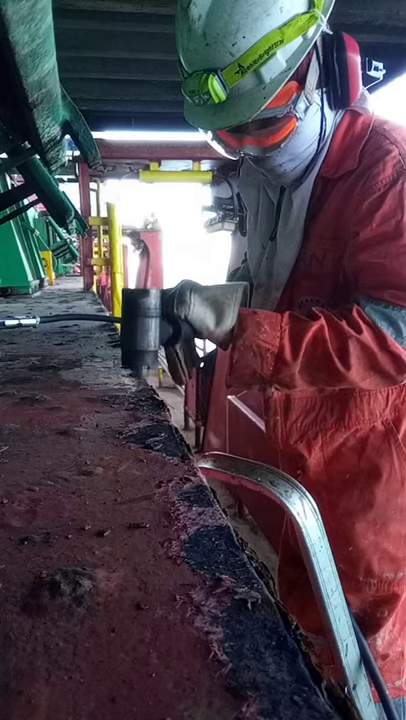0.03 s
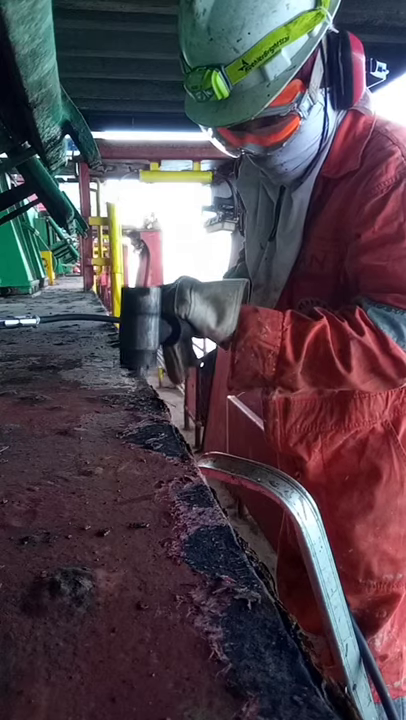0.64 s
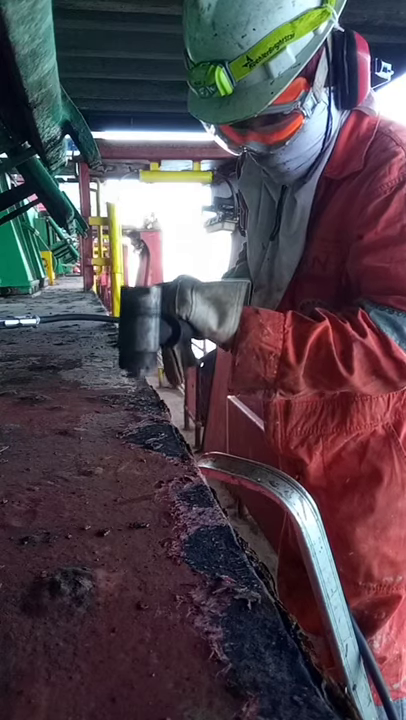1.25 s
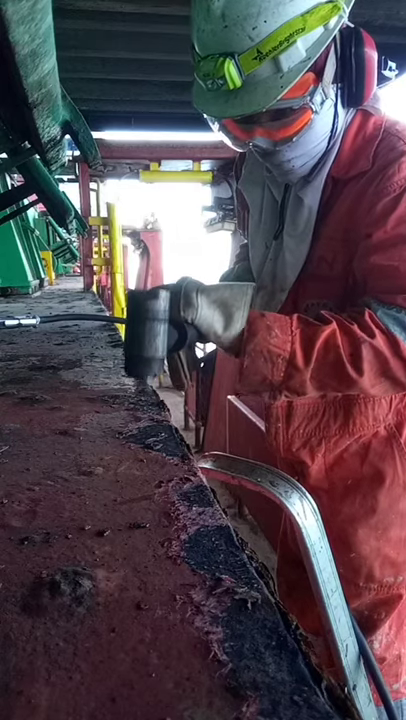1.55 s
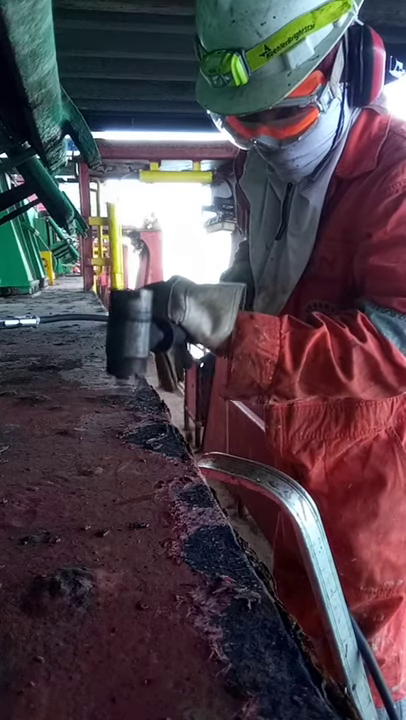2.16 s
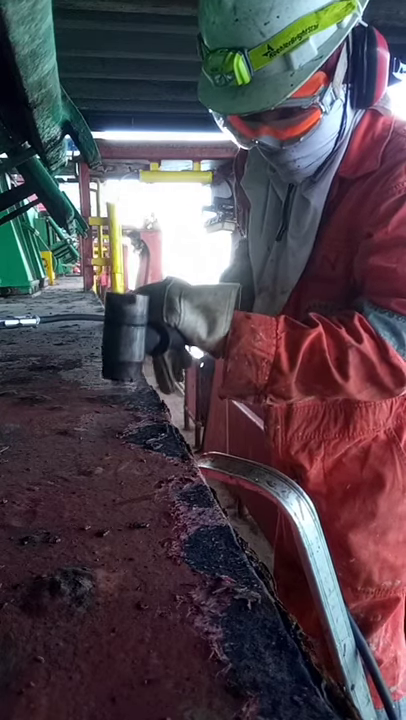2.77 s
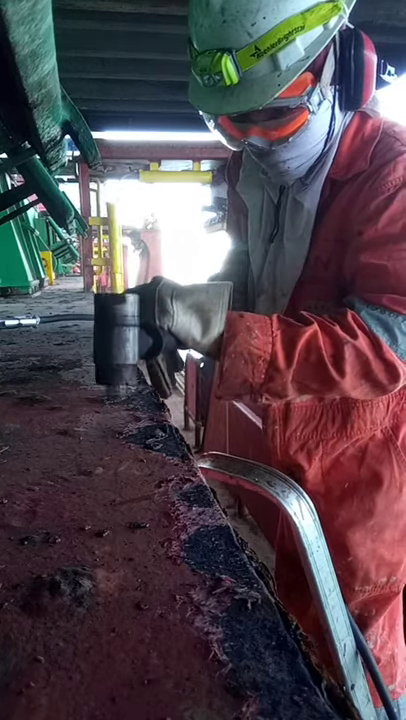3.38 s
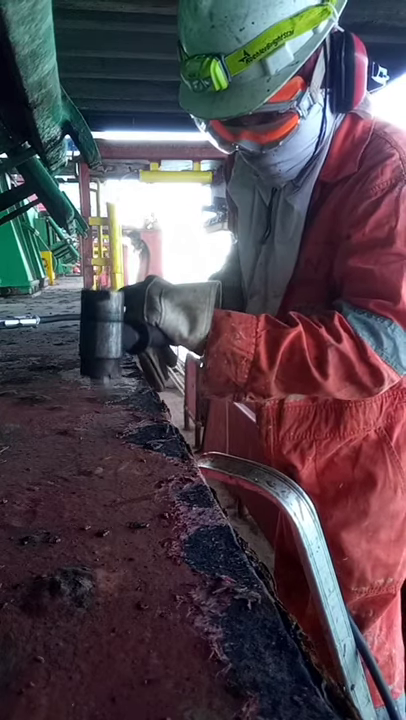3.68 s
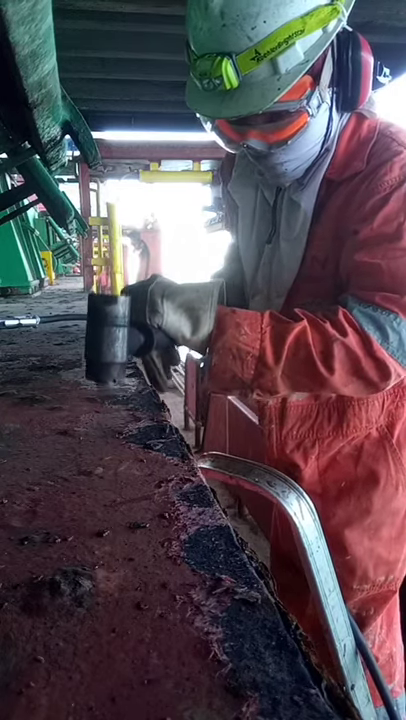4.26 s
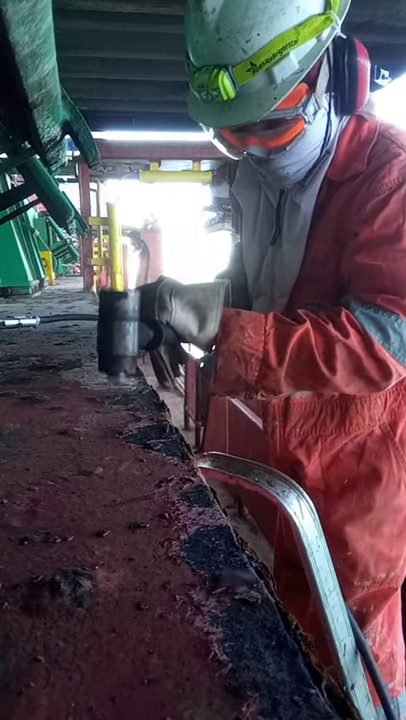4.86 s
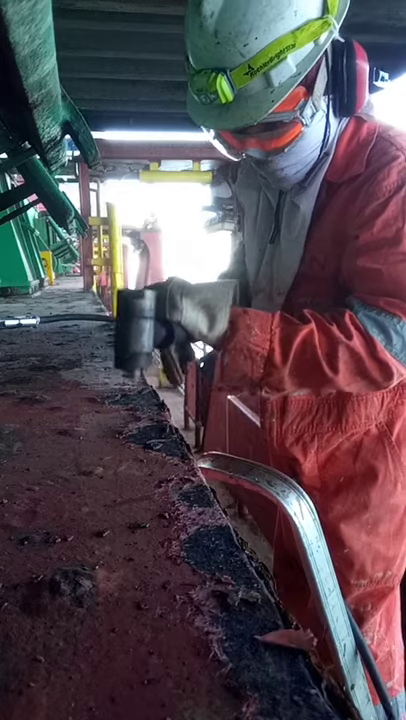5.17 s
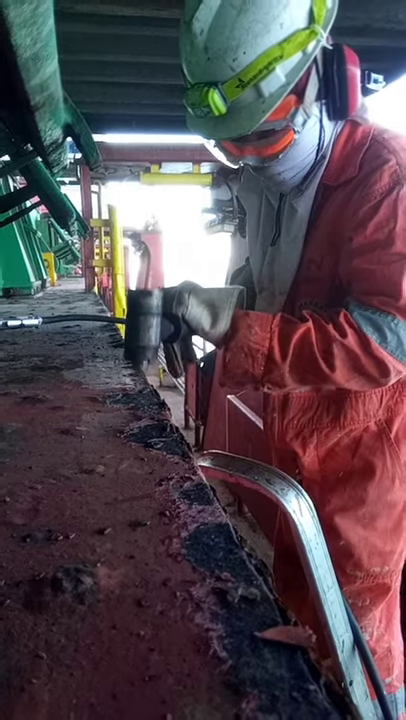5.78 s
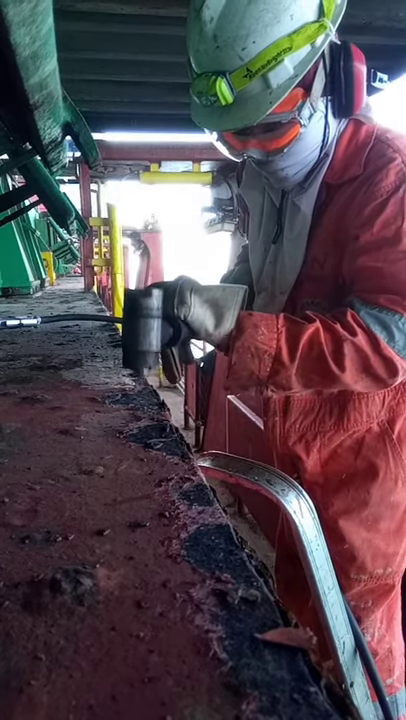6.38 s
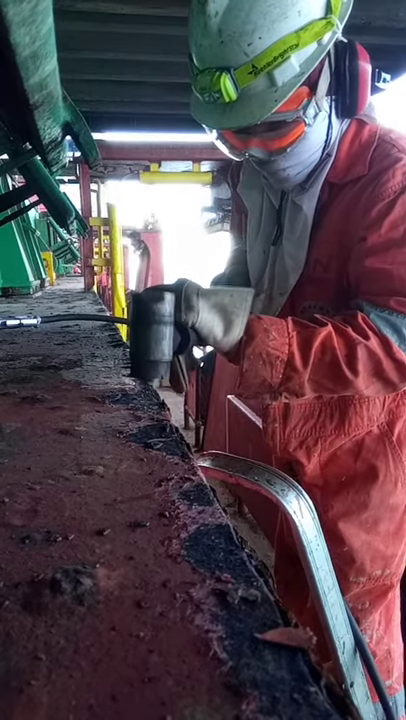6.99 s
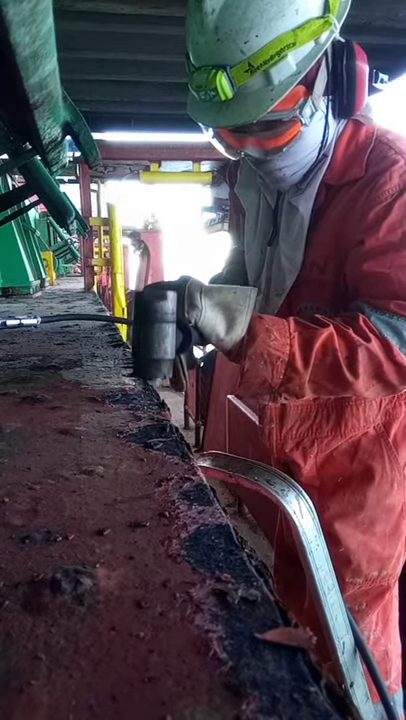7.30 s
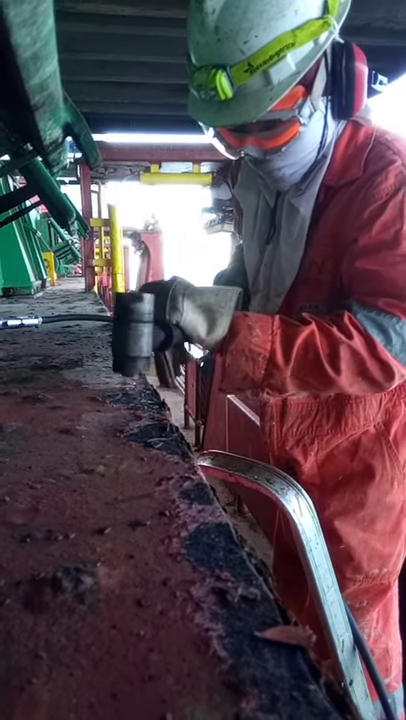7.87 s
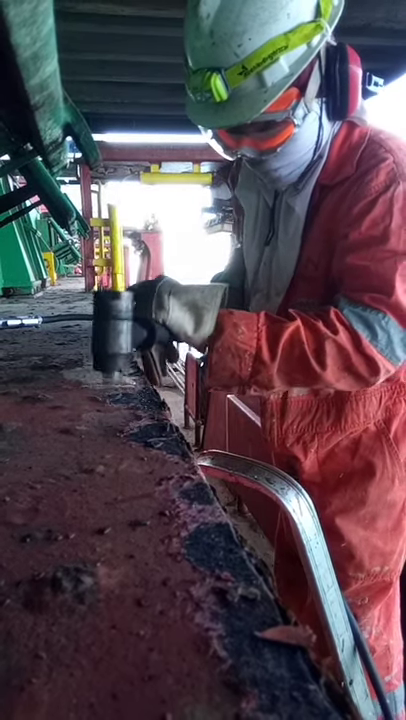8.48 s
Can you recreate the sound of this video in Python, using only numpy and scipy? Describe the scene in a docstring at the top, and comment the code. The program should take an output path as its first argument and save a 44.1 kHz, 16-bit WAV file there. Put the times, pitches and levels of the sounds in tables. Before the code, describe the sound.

Close by on a roofed steel deck, an air-powered hammer chips rust in a loud, continuous clatter. A pulsing low buzz and fluttering air hiss run beneath sharp metallic pings, with small gusts hitting the microphone. From about halfway the tool gives a few dull thuds, and its ring turns brighter on barer metal. Distant machinery hums faintly throughout.

```python
"""A steel deck under a roof, a phone microphone an arm's length from a pneumatic scaling hammer.
From the start three pistons beat against each other at about 61, 64 and 68 strokes a second: each stroke
puffs exhaust air through the housing, then strikes the plate, which rings and sheds rust. Air hisses and
gusts brush the microphone. From about 3 to 5 s the slow piston leads the throb; from 4.5 s come a few dull
knocks, and near 6 s barer steel rings brighter. Distant machinery drones to the end."""
import sys
import numpy as np
from scipy import signal
from scipy.fft import rfft, irfft
from scipy.io import wavfile
from scipy.ndimage import map_coordinates

SR = 44100
rng = np.random.default_rng(int(sys.argv[2]) if len(sys.argv) > 2 else 0)


def store_wav(level_fs):
    """Save 16-bit WAV to argv[1]."""
    pcm = np.round(np.clip(np.atleast_2d(level_fs), -1, 1) * 32767)
    wavfile.write(sys.argv[1], SR, pcm.T.astype(np.int16))


N = 385434
T = np.arange(N) / SR
SPOT_HZ = 14  # how often the struck spot changes
# spectrum of a bit cracking on the plate: (frequency [Hz], gain [dB])
CRACK_SPECTRUM = [(200, -41.5), (500, -10), (900, 3), (1200, -9), (1650, -1), (2300, -0.5), (3200, 0.5),
                  (4500, -1.5), (6400, 0), (8000, -18)]


def undb(db):
    """Decibels to gain."""
    return 10 ** (np.asarray(db) / 20)


def level(x, db):
    """Scale to an rms level."""
    return x * undb(db) / np.sqrt(np.mean(x ** 2))


def noise():
    """White noise."""
    return rng.standard_normal(N)


def walk(hz):
    """Random values, hz of them a second, joined smoothly; spread near 1."""
    knots = rng.standard_normal(4096)
    return map_coordinates(knots, [T * hz], order=2, mode="wrap")


def curves(rows):
    """One control for each column after the time, moving in straight lines between rows."""
    times, *columns = np.transpose(rows)
    return np.array([np.interp(T, times, column) for column in columns])


def swing(rows):
    """A level curve in dB above its own average."""
    db = curves(rows)[0]
    return db - np.mean(db)


def add(out, s, sound):
    """Mix a short sound in at a time."""
    start = int(s * SR)
    out[start:start + len(sound)] += sound[:N - start]


def colour(x, points):
    """Causal filter with a given (frequency [Hz], gain [dB]) spectrum, built from the cepstrum."""
    size = 4096
    hz, db = np.transpose(points)
    bins = np.maximum(np.fft.rfftfreq(size, 1 / SR), 1)
    gain = undb(np.interp(np.log(bins), np.log(hz), db))
    cepstrum = irfft(np.log(gain))
    cepstrum[1:size // 2] *= 2
    cepstrum[size // 2 + 1:] = 0
    response = irfft(np.exp(rfft(cepstrum)))
    return signal.fftconvolve(x, response)[:N]


def fade(x, seconds):
    """Give every impulse an exponential tail."""
    return signal.lfilter([1], [1, -np.exp(-1 / (seconds * SR))], x)


def resonate(x, hz, width):
    """One damped mode, gain 1 at its centre."""
    return signal.lfilter(*signal.iirpeak(hz, hz / width, fs=SR), x)


def gliding_mode(x, hz, width):
    """A damped mode whose pitch moves, gain 1 at its centre."""
    turn = np.exp(2j * np.pi * np.cumsum(hz) / SR)
    envelope = fade(x * np.conj(turn), 1 / (np.pi * width))
    return np.real(turn * envelope) * 2 * np.pi * width / SR


def tail(x, t60_s, spectrum):
    """A dense decaying response: countless plate modes, or reflections."""
    t = T[:SR // 2]
    response = rng.standard_normal(len(t)) * undb(-60 * t / t60_s) * (t > .002)
    response /= np.sqrt(np.sum(response ** 2))
    return colour(signal.fftconvolve(x, response)[:N], spectrum)


def impulses(times, scatter_db):
    """One impulse at each time; air pressure caps its strength, and a poor stroke falls short."""
    out = np.zeros(N)
    sizes = undb(-scatter_db * rng.rayleigh(size=4096)[:len(times)])
    inside = (times >= 0) & (times < T[-1])
    np.add.at(out, (times[inside] * SR).astype(int), sizes[inside])
    return out


def jitter(times, spread_s):
    """Make each moment slightly early or late."""
    return times + spread_s * rng.standard_normal(1024)[:len(times)]


def pistons(lean_db):
    """Stroke times of three free pistons: each rate wanders, and stumbles more under load."""
    # stroke rates: (time [s], main piston [Hz], slow piston [Hz], fast piston [Hz])
    rates = [(0.1, 64.8, 61.5, 68.3), (0.7, 64.6, 61, 68), (1.1, 65, 61, 67.5), (1.6, 64.7, 62.3, 67.3),
             (2.0, 64.4, 61.8, 67.5), (2.6, 63.8, 61.3, 66.8), (3.0, 64.8, 60.5, 68.3), (3.5, 64, 61.6, 68),
             (3.9, 65, 61.2, 67.5), (4.5, 64, 60.8, 68.5), (5.0, 64.5, 61, 69.5), (5.6, 64.3, 60.5, 68),
             (6.3, 65.2, 62, 67.3), (6.8, 64.6, 61.5, 67.5), (7.4, 65, 62, 67.5), (8.0, 64.3, 61.5, 67.3),
             (8.7, 64, 62, 67.5)]
    wander_hz, stumble_hz = .5, .7 * undb(2 * lean_db)
    strokes = []
    for hz in curves(rates):
        cycles = np.cumsum(hz + wander_hz * walk(5) + stumble_hz * walk(60)) / SR
        times = np.interp(np.arange(1, cycles[-1]), cycles, T)
        strokes.append(jitter(times, spread_s=.00008))
    return strokes


def strikes(times):
    """The bit lands just after the puff and bounces once."""
    landing = impulses(times + .0027, scatter_db=4.6)
    bounce = impulses(times + .0095, scatter_db=5)
    return landing + undb(-6) * bounce


def steel_ring(hits, low_db, mid_db, high_db):
    """The struck spot wanders, so each mode of the steel shifts, swells and fades over a few blows."""
    # modes of the bits and the plate: (frequency [Hz], width [Hz], gain [dB])
    modes = [(1350, 91, -3.5), (1612, 120, 0.5), (1890, 80, -5.5), (2030, 180, -10), (2292, 110, -0.5),
             (2507, 55, -6.5), (2705, 35, -2.5), (2834, 45, -4), (2975, 33, -1.5), (3154, 65, -3),
             (3350, 24, -9), (3695, 120, -1.5), (3960, 60, -4), (4125, 43, -5), (4254, 75, -4),
             (4730, 91, -6), (5570, 200, -13)]
    ring = 0
    for hz, width, db in modes:
        band_db = low_db if hz < 2000 else mid_db if hz < 3000 else high_db
        drive = hits * np.tanh(walk(22) + 1.14 * noise())
        drive *= undb(1.7 * np.tanh(walk(5)))
        shifted_hz = hz * (1 + .004 * walk(SPOT_HZ))
        ring = ring + undb(db + band_db) * gliding_mode(drive, shifted_hz, width)
    return ring


def blows(hits, lean_db, grip_db):
    """Each blow cracks, crumbles rust and rings the steel; the spot struck sets the ring's balance."""
    # low ring, changing from spot to spot: (time [s], relative level [dB])
    clang = [(0.1, -43), (1.3, -42.5), (1.6, -43), (3.1, -42), (3.9, -41), (4.1, -43.5), (4.3, -41),
             (5.15, -44), (5.45, -42.5), (7.5, -42.5), (8.3, -41.5), (8.7, -42)]
    # midrange clatter as the bits dig in: (time [s], relative level [dB])
    clatter = [(0.1, -42.5), (0.7, -44.5), (1.6, -46), (2.4, -42.5), (2.9, -47.5), (3.9, -44), (4.3, -43.5),
               (4.9, -45.5), (5.1, -44), (5.3, -45.5), (6.1, -42.5), (6.35, -43), (7.0, -43.5), (8.3, -43),
               (8.7, -43)]
    # high ring, brighter on bare patches: (time [s], relative level [dB])
    bare_steel = [(0.1, -44), (0.9, -45), (1.1, -43.5), (2.5, -41), (3.1, -44.5), (3.5, -41), (4.7, -44),
                  (5.1, -45), (5.3, -44.5), (5.7, -42.5), (5.9, -39.5), (6.5, -40.5), (7.3, -40),
                  (8.7, -41.5)]
    plate_db = -41.5 + .23 * lean_db + grip_db
    low_db = -43.8 + 1.9 * swing(clang) + grip_db
    mid_db = -42.5 + 1.2 * swing(clatter) + grip_db
    high_db = -41.5 + .76 * swing(bare_steel) + grip_db + .5 * walk(4.7)
    crumbs = fade(hits, .0043) * noise() * undb(3.7 * noise())
    crack = colour(level(hits, -12.5) + level(crumbs, 0), CRACK_SPECTRUM)
    ring = steel_ring(hits, low_db, mid_db, high_db)
    return level(crack, plate_db - .25) + level(ring, np.mean(plate_db) - .5)


def bites():
    """A bit meets bare steel: a sharp crack, a brief clang, and a rough ping around one mode."""
    # hard blows: (time [s], crack gain [dB], ping gain [dB], pitch [Hz])
    hard_blows = [(0.2337, -23.5, -34, 3700), (0.407, -27, -36, 3720), (0.452, -32, -34, 3720),
                  (0.469, -30, -33, 3800), (0.683, -37, -33, 2861), (0.749, -36, -31.5, 3660),
                  (0.765, -29, -32, 3680), (0.8738, -28, -27, 3680), (0.934, -30, -37, 3740),
                  (1.138, -29, -37, 4170), (1.415, -35, -35, 3540), (1.885, -27, -33, 4470),
                  (1.917, -35, -36, 3646), (2.073, -29, -32, 4720), (2.3111, -24, -34, 1710),
                  (2.325, -32, -39, 3747), (2.526, -30, -33, 3700), (3.231, -34, -39, 3160),
                  (3.301, -31, -37, 3170), (3.387, -27, -37, 3170), (3.623, -25, -35, 3620),
                  (3.657, -31, -36, 3200), (4.2407, -24.5, -38, 2472), (4.306, -26, -37, 1700),
                  (4.3235, -29, -43, 2475), (4.387, -32, -34, 1730), (4.944, -25.5, -30, 3750),
                  (5.055, -27, -32, 3170), (5.086, -28.5, -39, 2630), (5.117, -26, -33, 2570),
                  (5.131, -27, -33, 2594), (5.1933, -22, -37, 1850), (5.439, -31, -34, 3700),
                  (5.6042, -26, -33, 3940), (5.6198, -26, -26, 3800), (6.338, -35, -29, 2696),
                  (6.569, -31, -31, 4170), (6.5895, -24, -28, 3580), (6.64, -43, -30, 3670),
                  (6.8553, -23.5, -26, 4070), (7.164, -36, -32, 3200), (7.749, -33, -30, 3665),
                  (7.843, -25, -42, 5800), (7.949, -30, -33, 3756), (8.199, -23, -39, 4940),
                  (8.326, -28.5, -37, 2040), (8.406, -29, -29, 2807), (8.4194, -25, -25, 3780)]
    out = np.zeros(N)
    t = T[:SR // 10]
    for s, crack_db, ping_db, hz in hard_blows:
        crack, clang, ping = rng.standard_normal((3, len(t)))
        crack = undb(-4) * crack * np.exp(-t / .004)
        clang = level(resonate(clang, hz, width=1200), -8) * np.exp(-t / .011)
        ping = level(resonate(ping, hz, width=140), -5) * np.exp(-t / .01)
        add(out, s, undb(crack_db) * (crack + clang) + undb(ping_db) * ping)
    return colour(out, CRACK_SPECTRUM)


def singing_spots(hits):
    """While the bits dwell on a lively spot, blow after blow keeps one mode singing."""
    # lively spots: (time [s], half length [s], level [dB], pitch [Hz])
    spots = [(1.62, 0.16, -53, 2230), (3.37, .15, -48, 3200), (3.58, .06, -45, 4680),
             (3.83, 0.12, -45.5, 1640), (4.08, 0.018, -43, 2280), (4.27, .06, -46, 2320),
             (4.55, .28, -57, 1710), (4.6, 0.34, -51, 1835), (5.0, 0.039, -41, 1670),
             (5.625, .03, -47, 4300), (5.63, 0.067, -44, 4900), (5.92, 0.045, -45, 4930),
             (6.345, .025, -43, 2760), (7.35, .2, -51.5, 1990)]
    drive = hits * np.tanh(2 * noise())
    out = 0
    for s, half_s, db, hz in spots:
        dwell = np.exp(-((T - s) / half_s) ** 2)
        out = out + dwell * level(resonate(drive, hz, width=66), db)
    return out


def deck(chipping):
    """The plate's dense short ring; its colour changes as the bits move from spot to spot."""
    shares = np.array([walk(SPOT_HZ) for _ in range(3)])
    shares /= np.sqrt(np.sum(shares ** 2, axis=0))
    spectrum = [(300, -22), (1200, -16), (1700, -9), (7000, -8)]
    return sum(tail(chipping * share, t60_s=.07, spectrum=spectrum) for share in shares)


def throb(times, lean_db):
    """The tool recoils on each stroke and booms with the deck; under load it shudders more roughly."""
    # low resonances of the housing and the deck under it: (frequency [Hz], width [Hz], gain [dB])
    housing = [(180.4, 26.4, 8), (206, 23, 5.5), (262, 22, -6), (313, 14, -1.5), (427, 12, -4.5),
               (503, 22, -10.5)]
    # spectrum of an exhaust puff: (frequency [Hz], gain [dB])
    puff_spectrum = [(30, -35.5), (62, -10.5), (125, 6), (165, 6), (300, 4), (450, -19.5), (700, 6.5),
                     (950, 8.5), (1200, -21.5), (2500, -23), (7000, -17)]
    recoil = impulses(jitter(times, spread_s=.00024), scatter_db=1.2)
    shudder = fade(recoil, .0065) * noise()
    drive = level(recoil, 0) + level(shudder, -7 + .96 * lean_db)
    boom = sum(undb(db) * resonate(drive, hz, width) for hz, width, db in housing)
    puff = colour(drive, puff_spectrum)
    # so small a body radiates little below its first resonance
    low_cut = signal.butter(4, 152, "highpass", fs=SR, output="sos")
    return signal.sosfilt(low_cut, level(boom, -1.17) + level(puff, -9.5))


def bark(times):
    """The exhaust ports bark on each stroke and, more weakly, on the return."""
    # resonances of the exhaust ports: (frequency [Hz], width [Hz], gain [dB])
    ports = [(580, 16, -1), (709, 16, -3), (790, 24, 5), (845, 42, 4), (878, 36, 1.5), (952, 50, -2),
             (1065, 16, 0.5)]
    puffs = impulses(times, scatter_db=2)
    turbulence = fade(puffs, .002) * noise()
    returns = impulses(times + .00727, scatter_db=2)
    jet = level(puffs, 0) + level(returns, -17.5) + level(turbulence, -15)
    return level(sum(undb(db) * resonate(jet, hz, width) for hz, width, db in ports), 0)


def air_hiss(times, scrub_db):
    """The exhaust jet: a fluttering hiss that surges whenever a port opens."""
    # air flow: (time [s], level [dB])
    flow = [(0.1, -38.5), (0.3, -37.5), (1.5, -38), (1.7, -38), (2.9, -38.5), (3.1, -36.5), (4.3, -37.5),
            (4.7, -38), (5.1, -38), (5.9, -39.5), (7.3, -37.5), (8.7, -37)]
    # spectrum of the jet: (frequency [Hz], gain [dB])
    jet_spectrum = [(200, -19), (600, 2.5), (1200, -12), (2200, 0), (3300, -5), (4500, -1), (5400, 1),
                    (6000, 5), (6600, 3.5), (7000, -10), (8000, -17)]
    openings = impulses(times, scatter_db=3.5) + impulses(times + .0077, scatter_db=12.5)
    surge = 1 + .95 * fade(openings, .018)
    jet = noise() * surge * undb(walk(45))
    return level(colour(jet, jet_spectrum), curves(flow)[0] - 2.04 + scrub_db)


def air_spurts(times):
    """Extra air escapes in bright sputtering swells, chopped by the strokes."""
    # spurts of air: (time [s], peak level [dB], half length [s])
    spurts = [(1.743, -37, 0.046), (2.104, -45, 0.067), (3.074, -54, 0.088), (3.56, -40, 0.056),
              (3.831, -44, 0.044), (4.25, -41, 0.15), (5.054, -38, 0.048), (5.432, -38.5, 0.027),
              (8.353, -40, 0.044)]
    swell = sum(undb(db) * np.exp(-((T - s) / half_s) ** 2) for s, db, half_s in spurts)
    jet = noise() * (.44 + fade(impulses(times, scatter_db=3.5), .005))
    spectrum = [(2000, -30.5), (4200, -8.5), (5500, 0), (6500, -.5), (7200, -14)]
    return swell * level(colour(jet, spectrum), 0)


def knocks():
    """The tool rocks on the plate: short dull thuds, each around its own pitch."""
    # thuds: (time [s], level [dB], pitch [Hz])
    thuds = [(4.548, -40, 230), (4.876, -34, 400), (5.145, -29, 540), (7.054, -30.5, 220),
             (7.499, -32, 380)]
    out = np.zeros(N)
    age = T[:SR // 10] / .0022  # in rise times
    for s, db, hz in thuds:
        burst = rng.standard_normal(len(age))
        thud = resonate(resonate(burst, hz, 2.1 * hz), hz, 2.1 * hz)
        add(out, s, level(thud, db - 1.5) * age * np.exp(1 - age))
    return out


def gusts():
    """Short swells of rumble as exhaust air hits the microphone."""
    # gusts on the microphone: (time [s], level [dB])
    buffets = [(0.319, -47), (1.118, -40), (1.977, -44.5), (2.149, -40), (3.494, -42), (4.539, -41.5),
               (4.859, -40.5), (5.421, -46), (5.691, -38.5), (6.779, -41.5), (7.032, -46), (7.825, -39.5)]
    push = np.zeros(N)
    for s, db in buffets:
        age = np.maximum(T - s, 0) / .013  # in rise times
        push += undb(db) * age * np.exp(1 - age)
    spectrum = [(20, -35.5), (55, -11.5), (110, -3), (300, -11.5), (700, -21), (3000, -58.5)]
    return push * level(colour(noise(), spectrum), -1.8)


def machinery():
    """Machinery far behind the hammer: a wavering drone and a hum of nearly steady pitch."""
    # spectrum of the drone: (frequency [Hz], gain [dB])
    drone_spectrum = [(20, -65), (45, -13), (62, 7), (100, 4.5), (125, 1), (160, 8), (300, -0.5),
                      (600, -15.5), (1500, -14.5), (8000, -39.5)]
    drone = colour(noise(), drone_spectrum) * undb(1.5 * walk(6))
    hum_hz = 411.5 + 1.2 * walk(5)
    hum = np.sin(2 * np.pi * np.cumsum(hum_hz) / SR) * undb(4.5 * walk(4.6))
    return level(drone, -52) + level(hum, -59.5)


def scene():
    """The hammer close by, the roof's reflections around it, machinery in the distance."""
    # how hard each piston is leant on as the tool tilts, heard as its throb:
    # (time [s], main piston [dB], slow piston [dB], fast piston [dB])
    loads = [(0.1, -46, -52, -48), (0.7, -45, -52, -50), (1.25, -49, -50, -51), (1.65, -47, -52, -43.5),
             (2.1, -47, -47, -49), (2.45, -48, -48, -50), (2.8, -46, -44.5, -47), (3.2, -48, -43.5, -49),
             (3.7, -46, -43, -47), (4.3, -47, -44.5, -47.5), (4.8, -46.5, -44, -47.5),
             (5.3, -48, -45.5, -48), (5.7, -48, -50, -51), (6.3, -45, -52.5, -50.5), (6.9, -46.5, -52, -53),
             (7.6, -46, -53, -50.5), (8.3, -44.5, -50.5, -49), (8.7, -45, -49, -48)]
    loads_db = curves(loads)
    total_db = 10 * np.log10(np.sum(undb(loads_db) ** 2, axis=0))
    lean_db = total_db - np.mean(total_db)
    # the hand scrubs the bits to and fro: the hiss swells as their grip fades
    scrub_hz = 3.3 * (1 + .15 * walk(2))
    scrub_db = np.sin(2 * np.pi * np.cumsum(scrub_hz) / SR)
    strokes = pistons(lean_db)
    exhaust, hits = 0, 0
    for times, load_db in zip(strokes, loads_db):
        # a piston that bears less than the leading one goes slack
        slack_db = np.max(loads_db, axis=0) - load_db
        throb_db = load_db - .4 * slack_db
        bark_db = -48.5 + .15 * lean_db - 2.5 * slack_db
        strike_db = -np.minimum(2.2 * slack_db, 4)
        exhaust = exhaust + undb(throb_db) * throb(times, lean_db) + undb(bark_db) * bark(times)
        hits = hits + undb(strike_db) * strikes(times)
    chipping = blows(hits, lean_db, grip_db=-.4 * scrub_db) + bites()
    air = air_hiss(strokes[0], scrub_db) + air_spurts(strokes[0])
    tool = exhaust + chipping + singing_spots(hits) + deck(chipping) + air
    roof = tail(tool, t60_s=.35, spectrum=[(100, -16), (1000, -16), (7000, -17)])
    mono = tool + roof + knocks() + gusts() + machinery()
    return np.array([mono, mono])


def record(dry):
    """A mono phone microphone that opens just after the start and loses the top treble."""
    open_s, top_hz = .083, 7300
    lowpass = signal.firwin(141, top_hz, window=("kaiser", 7), fs=SR)
    return signal.fftconvolve(dry * (T > open_s), lowpass[None], mode="same")


dry = scene()
out = record(dry)
store_wav(out)
```